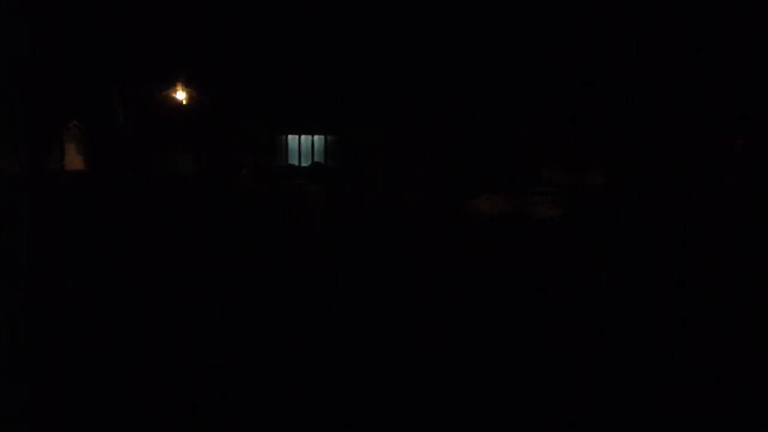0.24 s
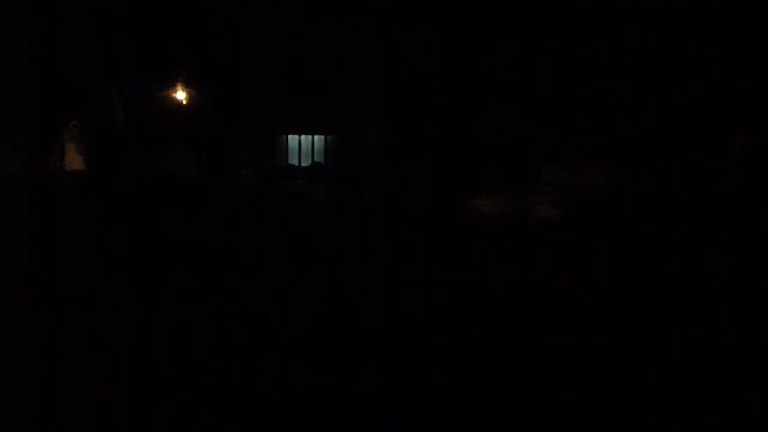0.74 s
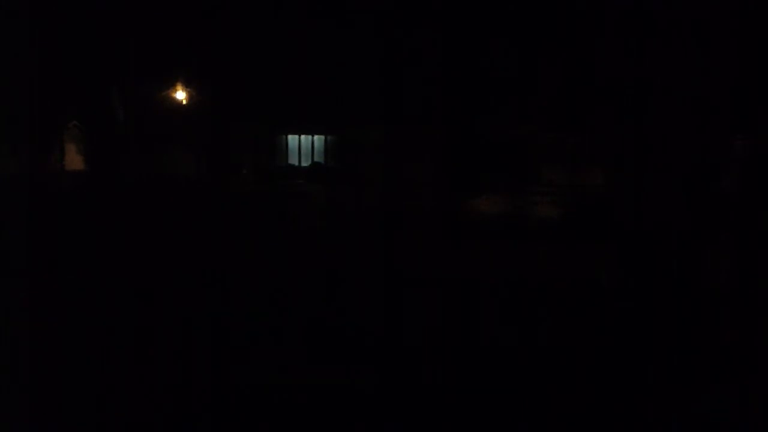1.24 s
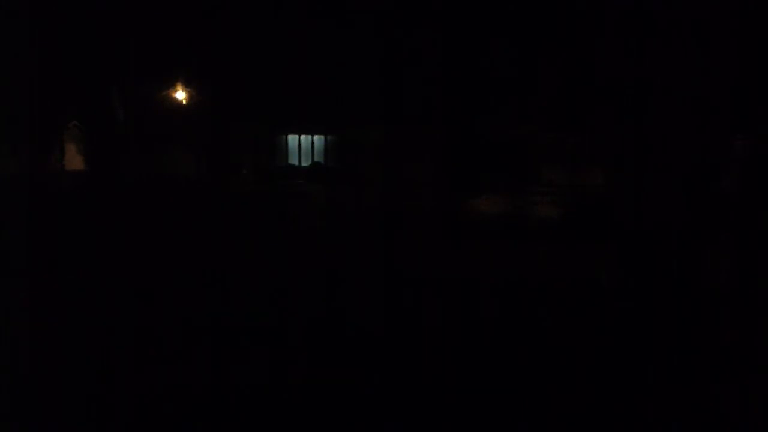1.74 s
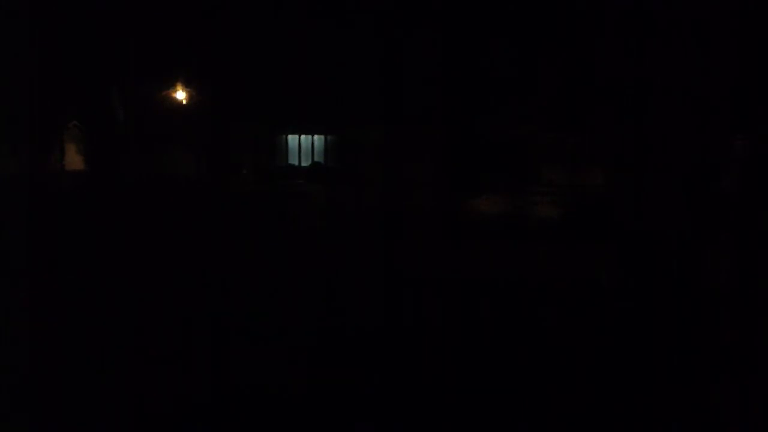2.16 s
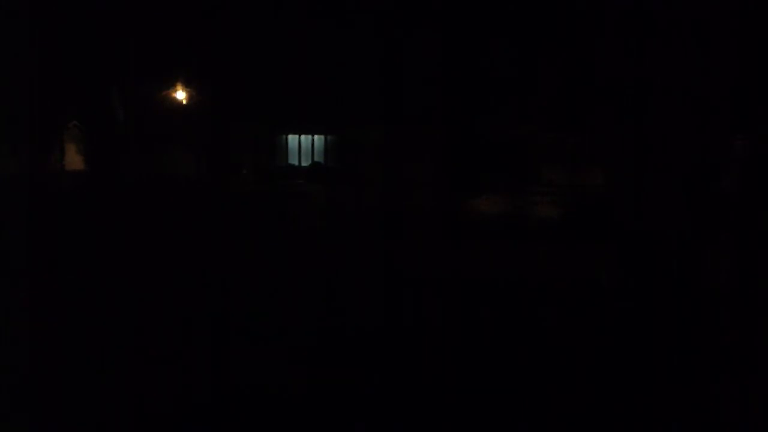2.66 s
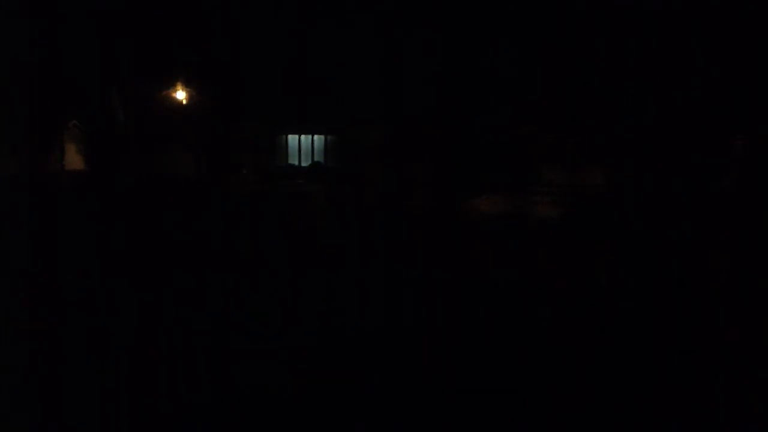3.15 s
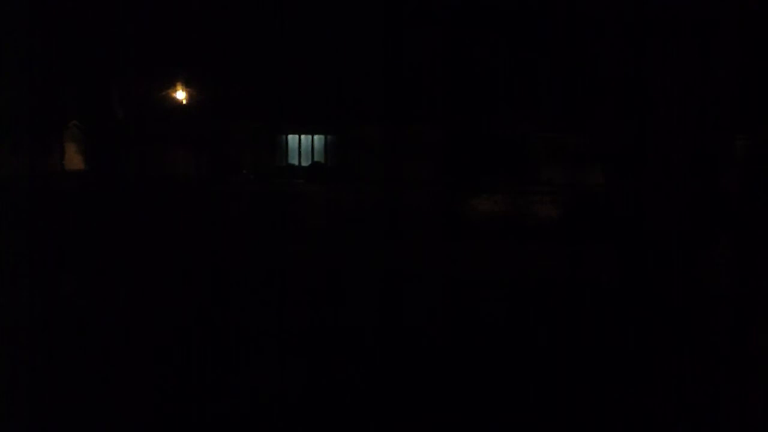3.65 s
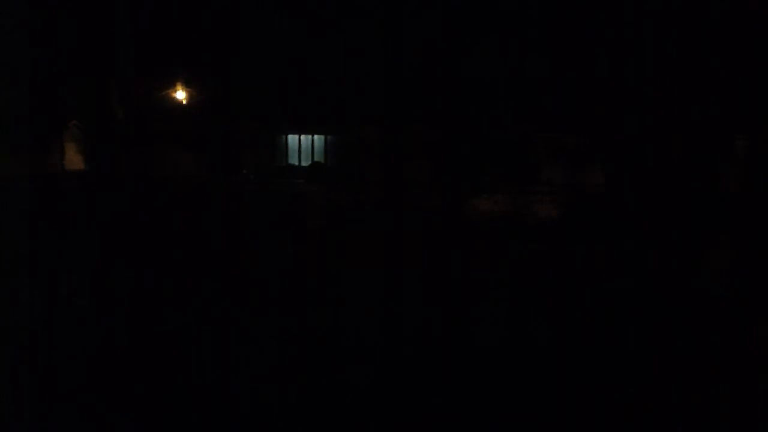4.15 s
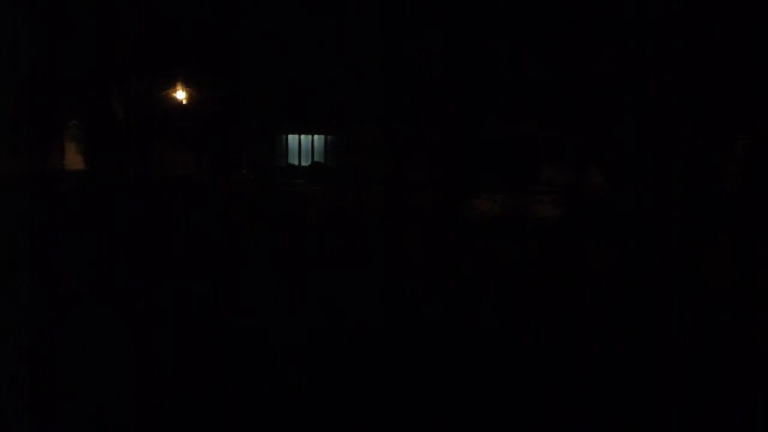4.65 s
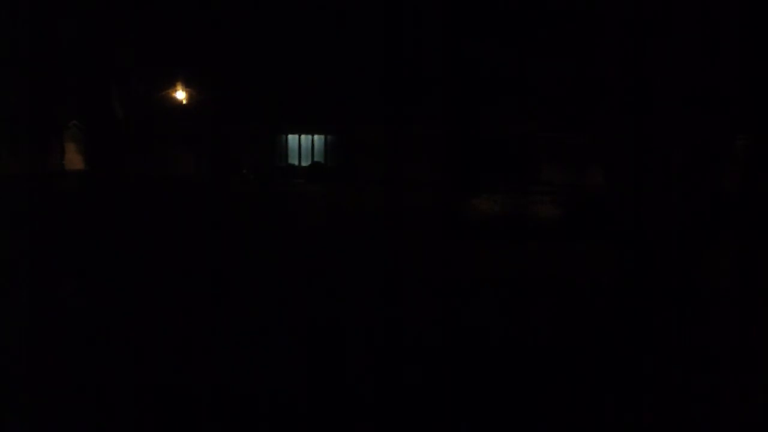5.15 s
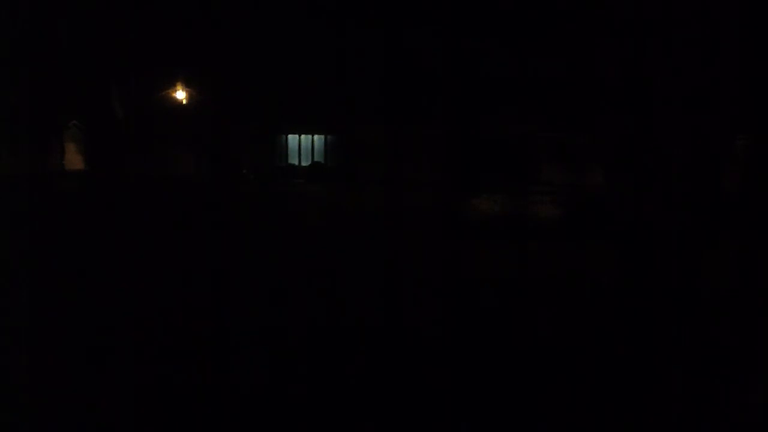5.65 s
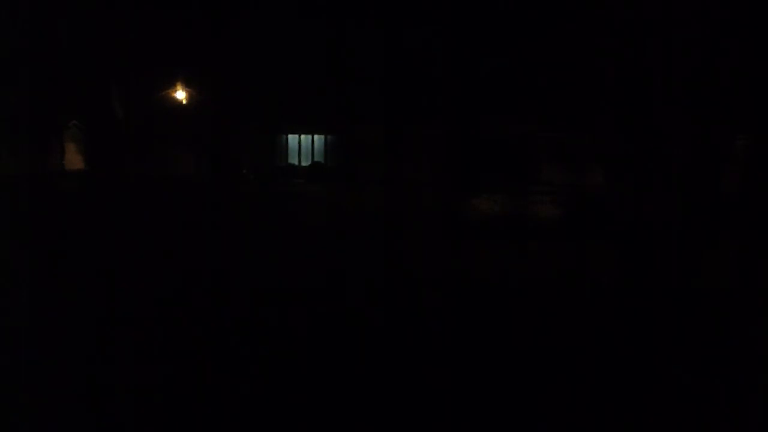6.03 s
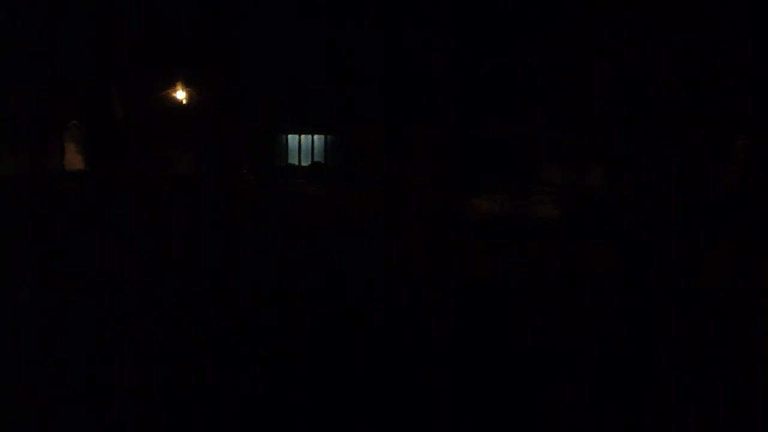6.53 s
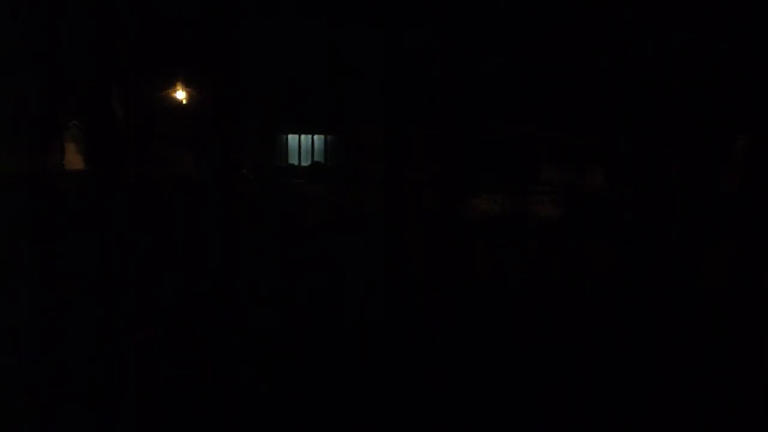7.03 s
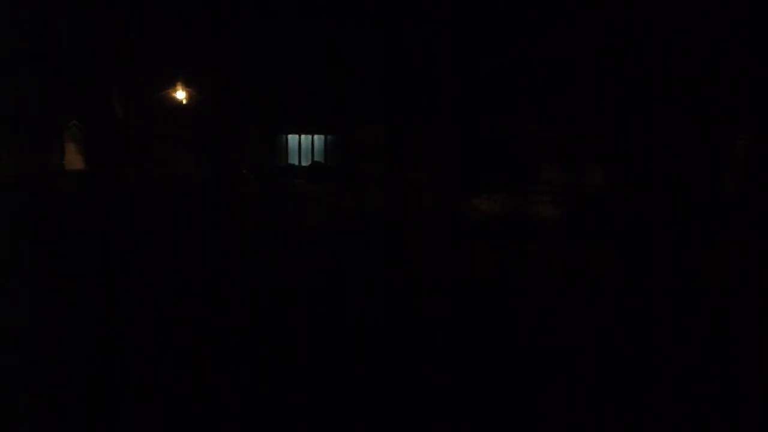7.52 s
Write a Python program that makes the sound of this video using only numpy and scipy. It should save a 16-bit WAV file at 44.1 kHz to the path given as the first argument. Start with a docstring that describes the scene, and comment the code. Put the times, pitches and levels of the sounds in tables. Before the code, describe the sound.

At night, an owl outside a window begins a run of short hoots, uneven at first, then louder and evenly spaced, each rising and falling in pitch. They echo lightly off nearby walls and houses. The run ends with one long call that slides down into a moan. A distant town murmurs faintly under a soft hiss, and at the very end a button clicks right at the microphone.

```python
"""Night, a camera microphone at a window. A finger brushes the case over faint hiss, and far traffic
swells in the low murmur of a town. Just after a second in, an owl outside starts a run of short hoots,
each a push of air that lifts pitch and loudness together; they bounce between nearby walls and come
back from houses farther off. The finger brushes again midway. Near 6.7 s one long call arches and
slides down into a moan. At the very end, right at the microphone, the finger rubs and clicks a button."""
import sys
import numpy as np
from scipy import signal
from scipy.fft import rfft, irfft, next_fast_len
from scipy.io import wavfile
from scipy.ndimage import map_coordinates

SR = 44100
rng = np.random.default_rng(int(sys.argv[2]) if len(sys.argv) > 2 else 0)


def file_out(sig):
    """Save sig as 16-bit WAV at sys.argv[1]."""
    # one column per channel
    cols = np.atleast_2d(sig).T
    # limit, then scale
    lim = np.clip(cols, -1, 1)
    pcm = np.round(lim * 32767).astype(np.int16)
    wavfile.write(sys.argv[1], SR, pcm)


N = 343228

# The town in the distance. Each row: frequency in Hz, relative level in dB.
TOWN_SPECTRUM = [(25, -55), (45, -38), (69, -18), (100, -6), (165, -4.5), (200, -4.5), (290, -3), (480, -7),
                 (750, -13), (1030, -14), (1330, -16.5), (1750, -24.5), (2150, -23.5), (2600, -31),
                 (4000, -49)]
# Far traffic. Each row: time of the height in seconds, half length in seconds, pitch in Hz, level in dB.
TRAFFIC_SWELLS = [(.16, .15, 104, -62), (1.106, 0.18, 118.4, -58), (7.4, .35, 100.4, -67.5)]
# The microphone's own noise. Each row: frequency in Hz, relative level in dB.
HISS_SPECTRUM = [(1650, -38), (2800, -3.5), (5230, -4), (14700, -2), (15300, -5)]
# Skin rubbing on the camera. Each row: frequency in Hz, relative level in dB.
RUB_SPECTRUM = [(300, -24), (900, 5.5), (2000, 3), (4200, -11), (8000, -16), (15000, -31)]
# Finger strokes on the camera. Each row: start in seconds, length in seconds, level in dB.
FINGER_STROKES = [(0, .2, -65.5), (3.7, .08, -67), (7.663, 0.012, -58), (7.703, .07, -70.5)]
# The plastic case under the button's click. Each row: frequency in Hz, relative level in dB.
CASE_SPECTRUM = [(500, -39), (1200, -12), (2200, -1.5), (2800, -13), (3500, 1), (4400, -8), (5700, -6.5),
                 (7400, -18.5), (8600, -10.5), (15000, -10)]
# Echoes from near walls and farther houses. Each row: delay in milliseconds, low-note gain in dB.
WALL_ECHOES = [(8.75, 0.03), (14.96, -8), (18.81, -15), (29.39, -8.5), (39.67, -21), (46.48, -13.5),
               (47.82, -24.5), (52.61, -18.5), (73.07, -19.5), (91.17, -24), (129.95, -16.5), (170.16, -21),
               (178.33, -25.5), (183.8, -23)]
# The owl's voice ahead of its throat. Each row: multiple of the pitch, gain in dB.
VOICE_HARMONICS = [(1, 0), (2, 10), (3, 16.5), (4, 13)]
# The owl's swollen throat, heard through the window. Each row: frequency in Hz, gain in dB.
THROAT_RESPONSE = [(200, 4), (300, -12.5), (400, -4), (470, -4), (540, -5.5), (590, -14), (700, -23),
                   (780, -32), (850, -31.5), (970, -50), (1500, -63), (1690, -60), (1950, -62),
                   (2220, -57.5), (2600, -60)]
# The run of short calls. Each row: time of the top in seconds, top pitch in Hz, rise from and fall to
# half effort in seconds, level in dB before the harmonic and throat gains.
SHORT_HOOTS = [(1.275, 550.6, 0.085, 0.044, -40), (1.5428, 559.3, .056, 0.07, -30),
               (1.9153, 418.7, .069, 0.048, -35.5), (2.0735, 302.7, .11, .05, -51.5),
               (2.498, 557.5, 0.12, 0.035, -28.5), (2.7668, 578, 0.069, .093, -26.5),
               (3.113, 531.6, .0836, .029, -26.5), (3.5671, 556.7, 0.083, 0.041, -25.5),
               (3.993, 555, 0.09, 0.04, -25), (4.3915, 550.3, 0.085, .048, -25.5),
               (4.7895, 553.6, .078, .06, -25.5), (5.1785, 551.6, 0.069, .0675, -25.5),
               (5.5743, 551, 0.069, 0.063, -25.5), (5.9785, 551.4, .0697, .0626, -25.5),
               (6.3886, 548, 0.07, 0.058, -26)]


def amp(db):
    """Decibels to gain."""
    return 10 ** (np.asarray(db) / 20)


def unit(x):
    """Scaled to rms 1."""
    return x / np.sqrt(np.mean(x ** 2) + 1e-20)


def along(points, hz):
    """(Hz, value) points read on a log frequency axis."""
    frequencies, values = np.transpose(points)
    return np.interp(np.log(hz + 1), np.log(frequencies + 1), values)


def clock():
    """The time of every sample in seconds."""
    return np.arange(N) / SR


def wobble(rate, size=N):
    """A smooth random curve, rate knots a second."""
    knots = rng.standard_normal(int(N * rate / SR) + 4)
    return map_coordinates(knots, [np.arange(size) * rate / SR])


def filtered(x, response):
    """x through a response given as a function of Hz."""
    size = next_fast_len(N + SR // 2)
    return irfft(rfft(x, size) * response(np.fft.rfftfreq(size, 1 / SR)), size)[:N]


def noise(spectrum):
    """Noise of rms 1 with the given colour."""
    return unit(filtered(rng.standard_normal(N), lambda hz: amp(along(spectrum, hz))))


def narrow_noise(centre_hz, width_hz):
    """A fuzzy tone of rms 1."""
    white = rng.standard_normal(N)
    return unit(filtered(white, lambda hz: 1 / (1 + (2 * (hz - centre_hz) / width_hz) ** 2)))


def traffic():
    """Far off, a low drone that swells now and then."""
    drone = amp(-74.5) * narrow_noise(centre_hz=105.6, width_hz=12)
    for top_s, half_length, hz, db in TRAFFIC_SWELLS:
        swell = amp(db) * np.exp(-((clock() - top_s) / half_length) ** 2)
        drone += swell * narrow_noise(centre_hz=hz, width_hz=9.4)
    return drone


def town(murmur_db=-56, hum_db=-65):
    """The town in the distance: a dull murmur, traffic and a wavering hum."""
    murmur = amp(murmur_db + 0.73 * wobble(2.97)) * noise(TOWN_SPECTRUM)
    hum = amp(hum_db) * narrow_noise(centre_hz=302.7, width_hz=6.2)
    return murmur + traffic() + hum


def microphone_hiss(db=-67):
    """The microphone's own faint, steady noise."""
    return amp(db) * noise(HISS_SPECTRUM)


def finger_brushes(attack_s=.005, t60=.2):
    """Skin on the case, close to the microphone: each stroke starts quickly, holds and dies away."""
    t, strokes = clock(), np.zeros(N)
    for start, length, db in FINGER_STROKES:
        onset = np.clip((t - start) / attack_s, 0, 1)
        since_release = np.maximum(t - start - length, 0)
        strokes += onset * amp(db - 60 * since_release / t60)
    return strokes * noise(RUB_SPECTRUM)


def button(start=7.7277, snap_t60=.0066, rattle_t60=.04, ring_t60=.018, case_hz=3550):
    """A sharp snap right at the microphone, then the plastic case rattles and rings briefly."""
    t = clock() - start
    age = np.maximum(t, 0)
    snap = amp(-39 - 60 * age / snap_t60)
    rattle = amp(-44 - 60 * age / rattle_t60)
    ring = amp(-43 - 60 * age / ring_t60) * np.sin(2 * np.pi * case_hz * age)
    return (t >= 0) * ((snap + rattle) * noise(CASE_SPECTRUM) + ring)


def yard(call, dull_hz=820, scatter_db=-24, t60=.99):
    """The first strong echo cancels a hoot at pitches it sweeps by; later ones trail off into scatter."""
    def walls(hz):
        mirrors = sum(amp(db) * np.exp(-2j * np.pi * hz * ms / 1000) for ms, db in WALL_ECHOES)
        return mirrors / (1 + (hz / dull_hz) ** 10)  # rough walls mirror only the low notes

    t = np.arange(SR) / SR
    build_up = 1 - np.exp(-t / .04)
    tail = rng.standard_normal(SR) * amp(-60 * t / t60) * build_up
    scatter = signal.fftconvolve(call, tail / np.linalg.norm(tail))[:N]
    return call + filtered(call, walls) + amp(scatter_db) * scatter


def voice(pitch, level_db):
    """Harmonics through the throat: whichever one lies near its resonance carries the call."""
    gruff = np.clip((520 - pitch) / 260, 0, 1)  # slack membranes vibrate unevenly at low pitch
    pitch = pitch * (1 + .012 * gruff * wobble(140, size=len(pitch)))
    level_db = level_db + 1.5 * gruff * wobble(110, size=len(pitch))
    phase = 2 * np.pi * np.cumsum(pitch) / SR
    return sum(amp(level_db + db + along(THROAT_RESPONSE, k * pitch)) * np.sin(k * phase)
               for k, db in VOICE_HARMONICS)


def arch(from_top, rise, fall, flatness):
    """Effort in a push of air: 1 at the top, half at rise seconds before and fall seconds after."""
    half_width = np.where(from_top < 0, rise, fall)
    return 1 / (1 + np.abs(from_top / half_width) ** flatness)


SLACK_HZ, STALL_HZ = 30.04, 242.5  # pitch tends to the first without effort, breaks off below the second


def hoot(effort, top_hz, rest_hz, db, fade_db):
    """Effort lifts pitch and loudness together; half effort costs fade_db. Too slack, the voice stops."""
    pitch = rest_hz + (top_hz - rest_hz) * effort
    sounding = 1 / (1 + (STALL_HZ / pitch) ** 20)
    loss_db = fade_db * (2 * (1 - effort)) ** 1.67  # loudness holds at the top longer than pitch does
    return sounding * voice(pitch, db - loss_db)


def short_hoots(flank_s=.0392, quiet_db=-57, fade_share=.6):
    """The owl beyond the window: one arch of effort for each call; the loud ones swell the most."""
    t, out = clock(), np.zeros(N)
    for top_s, top_hz, rise, fall, db in SHORT_HOOTS:
        span = (t > top_s - 2 * rise) & (t < top_s + 2 * fall)
        flatness = (rise + fall) / flank_s  # equally quick flanks give a longer hoot a flatter top
        effort = arch(t[span] - top_s, rise, fall, flatness)
        out[span] += hoot(effort, top_hz, SLACK_HZ, db, fade_db=fade_share * (db - quiet_db))
    return out


def long_hoot(top_s=6.683, moan_hz=321.6, sag_hz_per_s=205):
    """The closing call: a wide arch, then the air runs out in a sinking moan on the second harmonic."""
    t, out = clock(), np.zeros(N)
    span = np.abs(t - top_s) < 1
    from_top = t[span] - top_s
    rising = from_top < 0
    effort = arch(from_top, rise=.1705, fall=.1026, flatness=np.where(rising, 5.3, 3.7))
    moan_pitch = np.maximum(moan_hz - sag_hz_per_s * from_top, SLACK_HZ)
    rest_hz = np.where(rising, SLACK_HZ, moan_pitch)
    fade_db = np.where(rising, 17, 4.5 + 8 * from_top)  # swells steeply, lingers on the way down
    out[span] = hoot(effort, top_hz=558, rest_hz=rest_hz, db=-25.5, fade_db=fade_db)
    return out


def scene():
    """From the window, in mono: the owl out in the yard, the town far behind, the camera closest."""
    owl = yard(short_hoots() + long_hoot())
    return (owl + town() + microphone_hiss() + finger_brushes() + button())[None]


def record(dry, top_hz=15400):
    """The camera keeps nothing above its band limit."""
    return np.array([filtered(channel, lambda hz: hz < top_hz) for channel in dry])


dry = scene()
out = record(dry)
file_out(out)
```